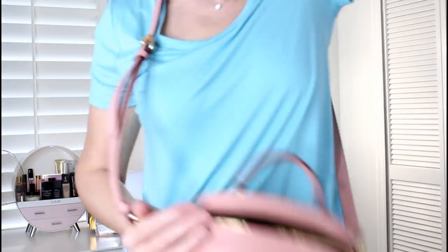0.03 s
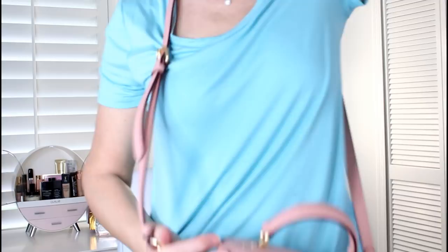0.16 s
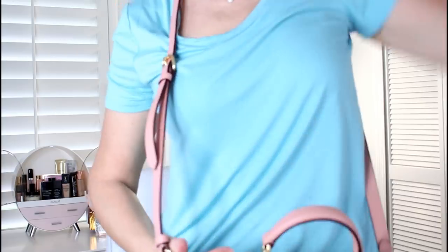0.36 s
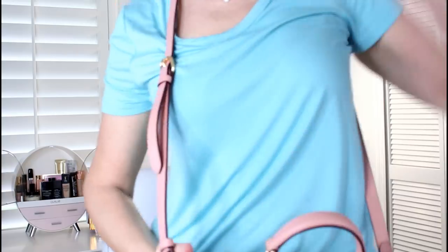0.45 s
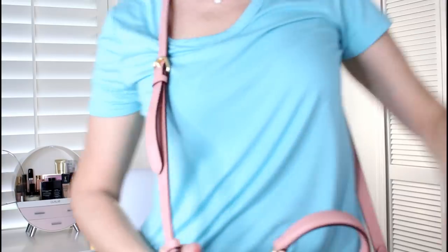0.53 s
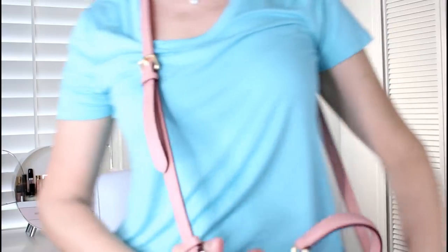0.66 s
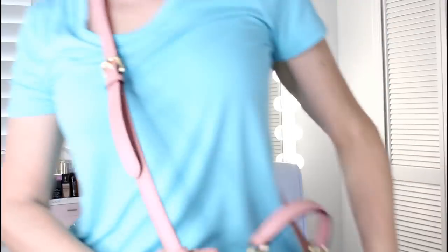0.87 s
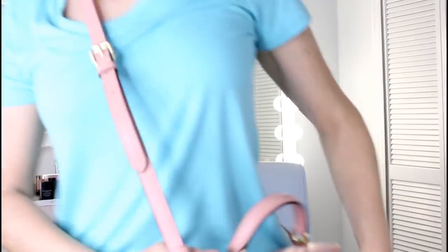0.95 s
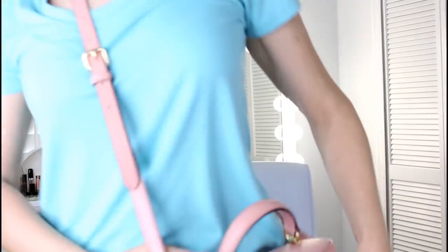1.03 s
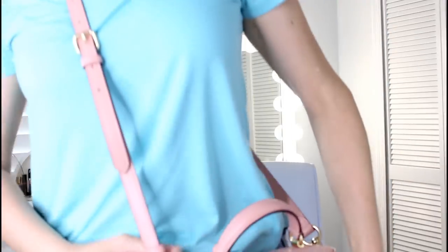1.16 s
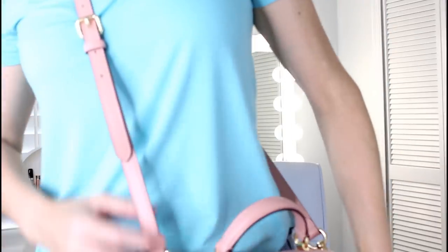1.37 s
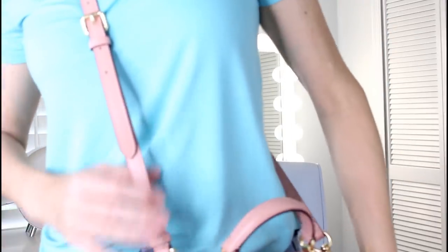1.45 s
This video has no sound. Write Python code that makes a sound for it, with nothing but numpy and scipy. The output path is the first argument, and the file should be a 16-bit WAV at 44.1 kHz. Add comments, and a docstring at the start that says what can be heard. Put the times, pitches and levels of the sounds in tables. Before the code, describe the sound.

Close handbag movement, with the strap rubbing on a shirt throughout, low hollow bumps from the bag body, tiny metallic clinks early and late, one brief leather scuff between, and faint room noise with mains hum.

```python
"""In a small quiet room, a stiff leather handbag is slung over a shoulder close to the microphone.
Over steady noise and mains hum, the strap rustles on a shirt as trains of random filtered impulses.
One scuff joins a wavering hollow tone to filtered noise. Buckles and clips click as noise bursts
with damped modes; the hollow body knocks as shaped impulses with a modal after-ring.
Diffuse reflections follow every sound of the bag."""
import sys
import numpy as np
from scipy import signal
from scipy.io import wavfile
from scipy.ndimage import uniform_filter1d

SR = 44100
rng = np.random.default_rng(int(sys.argv[2]) if len(sys.argv) > 2 else 0)


def unload_wav(signal):
    """Save mono or channel-first audio to the path in sys.argv[1] as 16-bit WAV at rate SR, clipped to [-1, 1]."""
    wavfile.write(
        sys.argv[1],
        SR,
        np.round(np.clip(np.atleast_2d(signal).T, -1, 1) * 32767).astype(np.int16),
    )


N = 66150  # samples, 1.5 s


def amp(db):
    """Logarithmic level: decibels become an amplitude ratio."""
    return 10 ** (np.asarray(db) / 20)


def unit(x):
    """Normalization: the signal is scaled to an rms of one."""
    return x / np.sqrt(np.mean(x ** 2) + 1e-20)


def read(points, hz):
    """Linear interpolation of a table along a logarithmic frequency axis."""
    f, value = np.transpose(points)
    return np.interp(np.log(hz + 1), np.log(f + 1), value)


def add(mix, s, sound):
    """Superposition: a sound is summed into the mix from time s."""
    part = mix[max(round(s * SR), 0):][:len(sound)]
    part += sound[:len(part)]


def impulse(points, ratio=1, size=8192):
    """Minimum phase: log gain and its Hilbert transform give a causal response with a peak of one."""
    hz = abs(np.fft.fftfreq(size, 1 / SR)) / ratio
    log_gain = np.log(amp(read(points, hz)))
    spectrum = np.exp(np.conj(signal.hilbert(log_gain)))
    h = np.fft.ifft(spectrum).real[:size // 2]
    return h / abs(h).max()


def colour(x, points):
    """Linear filtering by a unit-energy response, which keeps the power of white noise."""
    h = impulse(points)
    return signal.fftconvolve(x, h / np.linalg.norm(h))[:len(x)]


def ring(modes, t, ratio=1):
    """Modal superposition: a blow starts sines that decay exponentially, by 60 dB in each t60."""
    return sum(amp(db - 60 * t / t60) * np.sin(2 * np.pi * hz * ratio * t) for hz, db, t60 in modes)


def grains(spread_db, per_s):
    """Random impulse train: a dense series of tiny slips of uneven size."""
    size = amp(spread_db * np.minimum(rng.exponential(1, N), 4))
    occurs = rng.random(N) < per_s / SR
    return unit(size * rng.standard_normal(N) * occurs)


# steady noise spectrum: f/Hz, relative density level/dB
FLOOR_SPECTRUM = [(20, -27), (55, -0.5), (90, 0.5), (190, 5.5), (350, -9.5), (700, -3), (1400, -14.5),
                  (2500, -17), (4200, -20.5), (6000, -28), (16000, -32.5)]
# mains hum: f/Hz, rms level/dB
MAINS_HUM = [(59.5, -56.5), (120, -50)]


def background(floor_db=-49.5):
    """Stationary sources: coloured room noise and continuous mains hum of random phase."""
    t = np.arange(N) / SR
    hum = sum(amp(db) * unit(np.sin(2 * np.pi * (hz * t + rng.random()))) for hz, db in MAINS_HUM)
    noise = unit(colour(rng.standard_normal(N), FLOOR_SPECTRUM))
    return hum + amp(floor_db) * noise


# reverberation time of the room: f/Hz, t60/s
REVERBERATION = [(150, 0.1), (400, 0.31), (1500, 0.44), (4000, 0.67), (9000, 0.36), (16000, 0.14)]


def room(x, gap_s=0.0035):
    """Diffuse reverberation: sparse reflections of random sign, each band dying at its own rate."""
    t = np.arange(SR // 2) / SR
    taps = rng.choice([-1., 1.], len(t)) * (rng.random(len(t)) < .2)
    hz, at, bands = signal.stft(taps, SR, nperseg=256)
    decay = amp(-60 * at / read(REVERBERATION, hz)[:, None])
    tail = signal.istft(bands * decay, SR, nperseg=256)[1][:len(t)]
    tail = tail * np.clip(t / gap_s - .5, 0, 1)  # fades in from half the gap to one and a half gaps
    return signal.fftconvolve(x, tail / np.linalg.norm(tail))[:N]


# modes of the hollow bag: f/Hz, relative level/dB, t60/s
HOLLOW_MODES = [(354.3, -18.5, 0.2), (441, -23.5, 0.076), (471, -23, 0.11), (619, -36, 0.19),
                (773, -28, 0.12), (1358, -44.5, 0.16), (1794, -38, 0.07)]


def bag_ring(t):
    """Modal resonance: the free vibration of the hollow bag."""
    return ring(HOLLOW_MODES, t)


# course of the rustle: t/s, rub level/dB, crackle level/dB
RUSTLE_LEVELS = [(0, -54.5, -54), (0.039, -35, -53.5), (.12, -42, -51.5), (.21, -39, -50),
                 (.31, -37.5, -65), (.37, -41, -55.5), (.44, -48.5, -53), (.55, -45.5, -56.5),
                 (.64, -47, -89), (.78, -39.5, -60), (.85, -42.5, -53), (.94, -45, -56), (1.06, -47, -59.5),
                 (1.12, -37.5, -44.5), (1.19, -49.5, -52.5), (1.28, -44, -54), (1.38, -47.5, -90),
                 (1.5, -65.5, -80)]
# spectra of the rub and of the fine crackle: f/Hz, relative level/dB
RUB_SPECTRUM = [(80, -21.5), (220, -3.5), (360, 1.5), (520, -0.5), (850, -4.5), (1500, -7.5), (2400, -14.5),
                (4100, -15.5), (5400, -31.5), (9000, -29.5), (16000, -45)]
CRACKLE_SPECTRUM = [(1500, -11), (4000, 9), (8000, -4), (11000, -6.5), (15500, -7.5)]


def rustle(clump_db=2.0, slips_per_s=7000, crackles_per_s=2500, hollow_db=-5):
    """Dry friction: clumped small slips of strap on cloth excite the bag, with a fine crackle on top."""
    s, rub_db, crackle_db = np.transpose(RUSTLE_LEVELS)
    t = np.arange(N) / SR
    wander = uniform_filter1d(uniform_filter1d(rng.standard_normal(N), size=300), size=200)
    clumps = clump_db * unit(wander)
    slips = grains(spread_db=1.35, per_s=slips_per_s) * amp(np.interp(t, s, rub_db) + clumps)
    bag = bag_ring(t[:SR // 4])
    hollow = amp(hollow_db) * signal.fftconvolve(slips, bag / np.linalg.norm(bag))[:N]
    crackle_gain = amp(np.interp(t, s, crackle_db) + .5 * clumps)
    crackle = colour(grains(spread_db=0.0, per_s=crackles_per_s) * crackle_gain, CRACKLE_SPECTRUM)
    return colour(slips, RUB_SPECTRUM) + hollow + crackle


# hiss of leather sliding on cloth: t/s, level/dB
SLIDE_LEVELS = [(.645, -46), (.668, -37), (.679, -18.5), (0.701, -24.5), (.74, -30), (.79, -43), (.85, -77)]
# spectrum of that hiss: f/Hz, relative level/dB
HISS_SPECTRUM = [(150, -29), (350, -2), (520, 0.5), (640, -0.5), (780, -9), (1000, -12), (1700, -28),
                 (2500, -15), (3500, -22), (4900, -25), (6500, -47), (12000, -55)]


def scuff(waver=0.048):
    """Frictional excitation: sliding on the hip sounds a wavering hollow groan and a hiss of leather."""
    start_s, rise_s, hold_s, decay_s = .673, 0.007, 0.011, 0.0095
    groan_hz, groan_db = 500, -13
    out, t = np.zeros(N), np.arange(N) / SR
    rise = np.minimum(t / rise_s, 1) ** 2
    late = np.maximum(t - rise_s - hold_s, 0)
    drift = unit(uniform_filter1d(rng.standard_normal(N), size=150))
    hz = groan_hz * (1 + waver * drift)
    tone = unit(np.sin(2 * np.pi * np.cumsum(hz) / SR))
    add(out, start_s, tone * amp(groan_db) * rise * np.exp(-late / decay_s))
    s, db = np.transpose(SLIDE_LEVELS)
    hiss_gain = amp(np.interp(t, s, db)) * (t > s[0]) * (t < s[-1])
    return out + colour(rng.standard_normal(N) * hiss_gain, HISS_SPECTRUM)


# strikes of buckles and clips: t/s, level before halving of amplitude/dB, dull clack level re click/dB,
# note f/Hz, note level re click/dB, note t60/s
FITTING_STRIKES = [(.0455, -37, -5, 15100, -18, 0.11), (0.0683, -20.5, -10, 15300, -12, .13),
                   (.098, -35, 2, 8350, -3, .04), (.137, -30, -6, 13900, -7, .14),
                   (.139, -28, -12, 11700, -5, 0.036), (0.1796, -19.5, -3, 15400, -19, .1),
                   (0.1816, -16.5, -11, 11500, -28, 0.033), (.2655, -29.5, 2, 11900, -20, .03),
                   (0.2764, -29, 5, 7500, -11, .02), (.2864, -12, 2, 7430, -1.5, 0.0091),
                   (.356, -24, -9, 2850, -1, 0.017), (0.818, -35, -17, 15400, -10, 0.035),
                   (.8355, -26, -25, 11900, -20, .02), (.847, -27.5, 2.5, 2930, -4, .03),
                   (.8525, -29, -12, 8500, -3, .02), (.891, -34, -2, 8500, -19, .02),
                   (.909, -38, -3, 9900, -16, .02), (.925, -31, -5, 12200, -15, .02),
                   (0.9318, -36, 6, 12000, -22, .02), (.9765, -40, -8, 11900, -16, .02),
                   (1.036, -43.5, -6, 3080, 11.5, .02), (1.089, -8, -12.5, 9950, -5, 0.0078),
                   (1.0912, -19.5, -2.5, 14200, 0, .025), (1.113, -18, -16, 11800, -8, .02),
                   (1.116, -29, 7.5, 14000, -12, .02), (1.1215, -26, 4, 7300, -18, .02),
                   (1.125, -24, -16, 12000, -3, 0.013), (1.290, -43, -10, 11200, -2, 0.033)]
# damped modes shared by the fittings: f before detuning/Hz, level re click/dB, t60/s
FITTING_MODES = [(2280, -19.5, 0.036), (4370, -34, 0.035), (7300, -24, 0.01), (9950, -27.5, 0.0044),
                 (11700, -15, 0.012), (14950, -17, .016)]
# spectra of the bright click and of the duller clack: f/Hz, relative level/dB
CLICK_SPECTRUM = [(500, -25), (3000, -6), (6000, -8.5), (8500, -3), (10500, -2), (13000, -1.5),
                  (15500, -4.5), (17000, -3)]
CLACK_SPECTRUM = [(200, 5), (900, 1), (2200, 2.5), (4200, 6), (5600, 2), (7300, 6.5), (9500, -1),
                  (16000, -4.5)]


def clinks(detune=0.0079, click_decay_s=0.00091, clack_decay_s=0.0011):
    """Impact and modal decay: metal chatters for about a millisecond, then each fitting sings its note."""
    out, t = np.zeros(N), np.arange(SR // 5) / SR
    for s, db, clack_db, hz, note_db, t60 in FITTING_STRIKES:
        click_noise, clack_noise = rng.choice([-1., 1.], (2, len(t)))
        click = colour(click_noise * np.exp(-t / click_decay_s), CLICK_SPECTRUM)
        clack = amp(clack_db) * colour(clack_noise * np.exp(-t / clack_decay_s), CLACK_SPECTRUM)
        shared = ring(FITTING_MODES, t, 1 + detune * rng.standard_normal())
        note = ring([(hz, note_db, t60)], t)
        add(out, s, .5 * amp(db) * (click + clack + shared + note))
    return out


# knocks of the bag: t/s, level/dB, pitch f/Hz, slap level re knock/dB, after-ring level re knock/dB
BAG_KNOCKS = [(.001, -25.5, 500, -22, 8), (.027, -33, 437, 12.5, -5), (0.0319, -41, 400, -7, -12),
              (.052, -42, 450, -12, -6), (.069, -27.5, 496, -18, -8), (.155, -46.5, 447, 22, -3),
              (.180, -37.5, 450, 14, 4), (.201, -24, 443, -10, 6), (0.21, -24, 412, 5.5, -10),
              (0.2388, -2.5, 390, -4, -13), (0.275, -15, 390, -5.5, 4.5), (.2945, -18.5, 397, -32, 3.5),
              (0.3248, -33.5, 430, -11, -9), (0.349, -26.5, 393, -21, 2), (0.3785, -20.5, 347, -16, 8.5),
              (.401, -41, 378, -18, -4), (0.4934, -12, 390, -10, -11), (0.5674, -21, 394, -18, 7.5),
              (.599, -21, 370, -31, -2.5), (0.6688, -11, 398, -19, -15), (0.85, -28, 364, 1, 15.5),
              (.906, -28.5, 321, -25, 11), (.9517, -12.5, 389, -14, 4), (0.9602, -22.5, 403, -8, -11),
              (0.9859, -21, 430, -22, 5.5), (0.9953, -23, 384, -12, -23), (1.0903, -20, 356, -5.5, 8.5),
              (1.111, -29, 358, -5, -11), (1.225, -31.5, 370, -33, -8), (1.280, -27, 410, -30, -1.5),
              (1.3405, -18, 390, -6.5, -11)]
# spectra of the thump at its reference pitch and of the slap: f/Hz, relative level/dB
THUMP_SPECTRUM = [(20, -74.5), (80, -72.5), (170, -18.5), (260, -17.5), (335, 1), (480, -1.5), (600, -14.5),
                  (900, -20.5), (2000, -49.5), (6000, -66)]
SLAP_SPECTRUM = [(20, -59), (200, -45), (600, 14), (800, -10.5), (1300, 6), (1750, 4), (2200, -2),
                 (3600, -13), (5000, -41.5), (12000, -30), (16000, -44)]


def knocks(ring_delay_s=0.0026, thump_delay_s=0.001325, reference_hz=390):
    """Impulse response: a ragged slap of leather, then a hollow thump with a modal after-ring."""
    chatter_db, chatter_decay_s = -19.5, 0.0025
    out, t = np.zeros(N), np.arange(SR // 4) / SR
    after_ring = (1 - np.exp(-t / ring_delay_s)) * bag_ring(t)
    for s, db, hz, slap_db, ring_db in BAG_KNOCKS:
        chatter = amp(chatter_db) * rng.standard_normal(len(t)) * np.exp(-t / chatter_decay_s)
        contact = 0.65 * (t == 0) + chatter
        add(out, s, amp(db + slap_db) * signal.fftconvolve(contact, impulse(SLAP_SPECTRUM)))
        add(out, s + thump_delay_s, amp(db) * impulse(THUMP_SPECTRUM, hz / reference_hz))
        add(out, s + thump_delay_s, amp(db + ring_db) * after_ring)
    return out


def scene():
    """Superposition: direct sound of bag, fittings and cloth, their reverberation and the background."""
    body, metal, cloth = knocks(), clinks(), scuff() + rustle()
    reverberant = room(amp(-8.5) * body + amp(-11.5) * metal + amp(-15.5) * cloth)
    return (body + metal + cloth + reverberant + background())[None]


def record(dry, cut_hz=16000):
    """Band limitation: a linear-phase low-pass filter removes the highest treble."""
    lowpass = signal.firwin(301, cut_hz, window=("kaiser", 9), fs=SR)
    return signal.oaconvolve(dry, lowpass[None], "same")


dry = scene()
out = record(dry)
unload_wav(out)
```